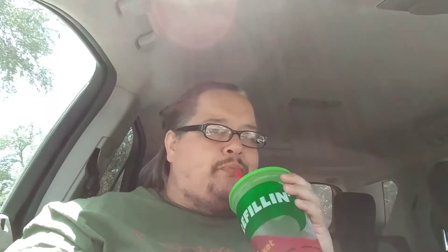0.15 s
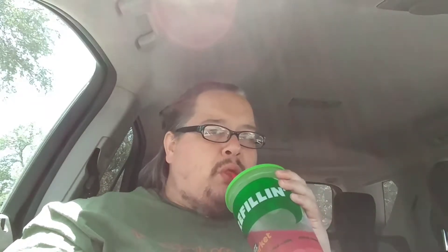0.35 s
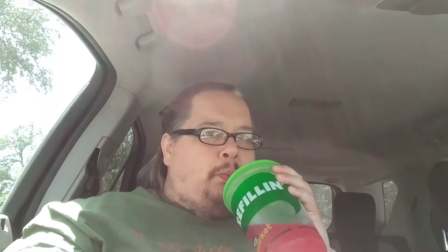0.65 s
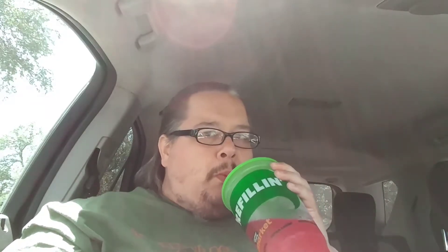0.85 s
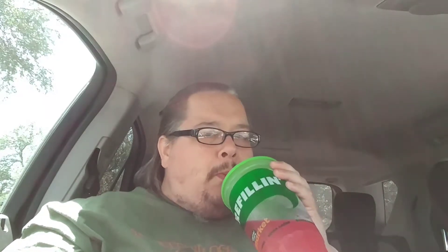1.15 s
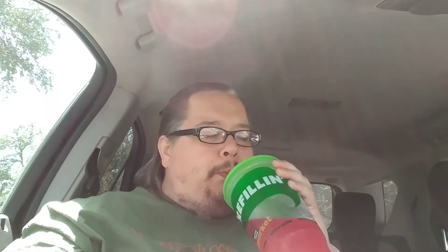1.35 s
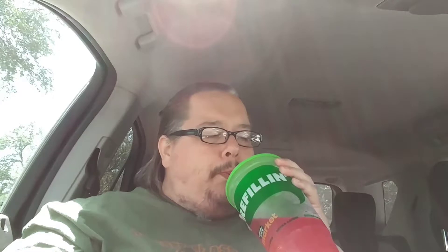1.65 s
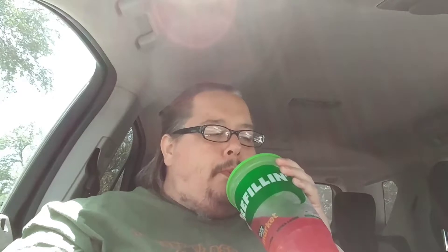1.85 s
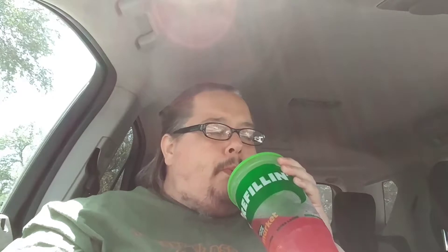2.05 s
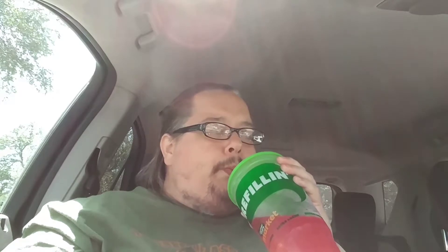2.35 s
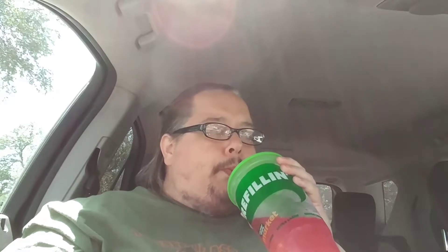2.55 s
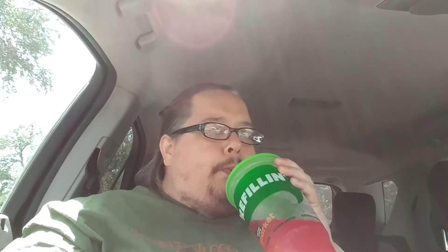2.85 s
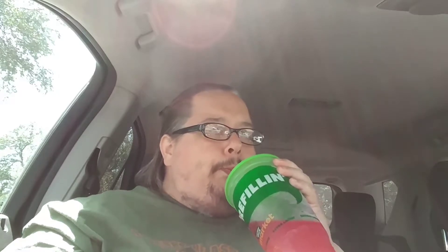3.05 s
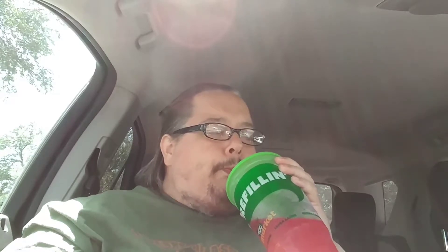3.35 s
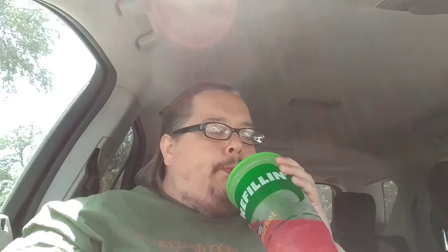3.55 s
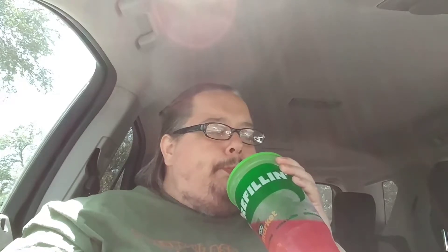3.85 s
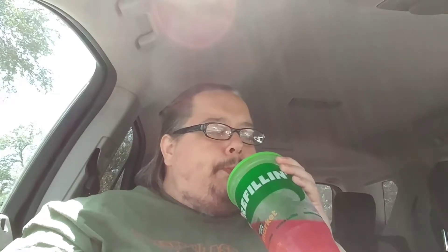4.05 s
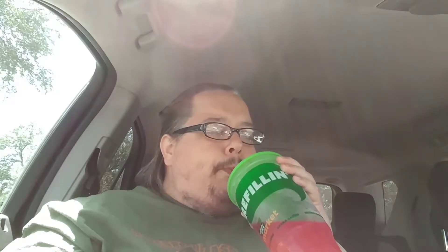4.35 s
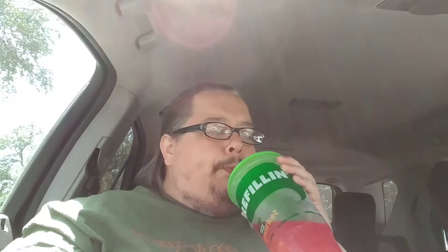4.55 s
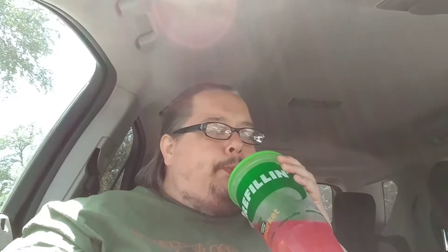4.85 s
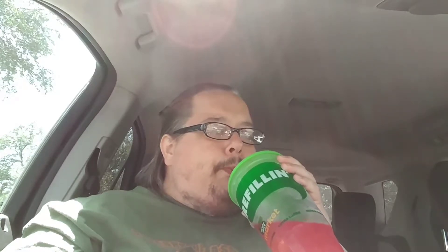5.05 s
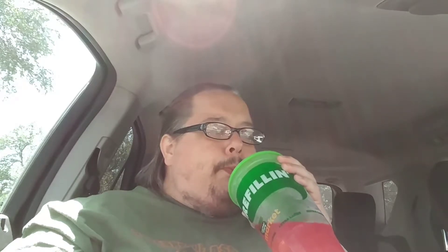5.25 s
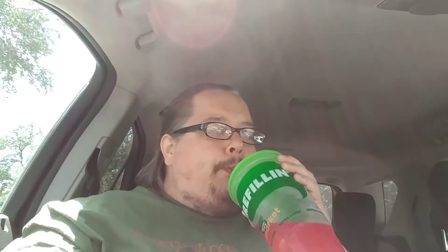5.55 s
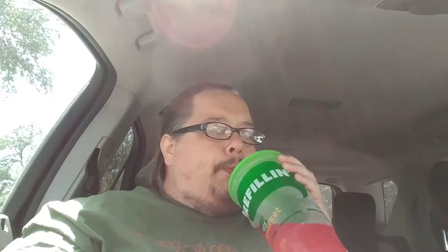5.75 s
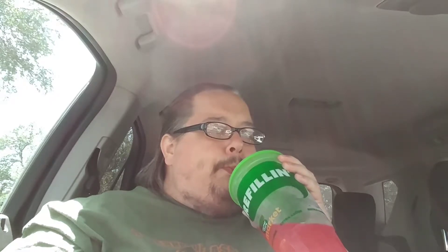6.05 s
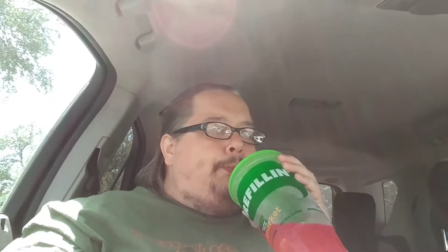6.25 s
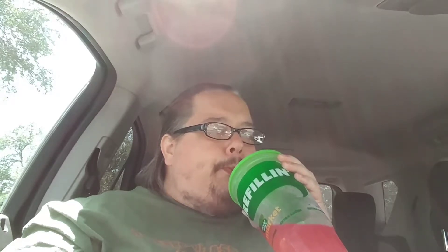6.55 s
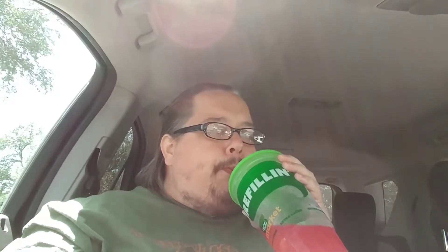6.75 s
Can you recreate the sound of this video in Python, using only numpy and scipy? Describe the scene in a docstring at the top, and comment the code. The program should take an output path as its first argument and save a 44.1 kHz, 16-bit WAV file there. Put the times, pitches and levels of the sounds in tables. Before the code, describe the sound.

Inside a closed parked car, an air-conditioning blower rushes continuously, bass-heavy with an airy top and faint vent whistles. Beneath it the idling engine and fan motor hum low and steady. About a second in, a plastic cup gives one tiny, crisp crackle. The engine hum dips briefly past the middle, and a very faint high hiss flicks by near the end. A small microphone hears it close, identical on both sides.

```python
"""An air-conditioning blower rushes in the closed cabin of a parked car, over the idling engine.
Its air is noise shaped by cabin, duct and vent resonances, with narrow noise bands for whistles.
Fan wheel and engine add hums: sines on multiples of a slightly wavering speed.
A plastic cup crackles once as decaying sines; a faint swell of high noise hisses near the end.
One small microphone in the cabin hears it all, the same on both channels."""
import sys
import numpy as np
from scipy import signal
from scipy.fft import rfft, irfft
from scipy.io import wavfile

SR = 44100
rng = np.random.default_rng(int(sys.argv[2]) if len(sys.argv) > 2 else 0)


def wrap_up_sound(samples):
    """Save the sound to the file named by the first command line argument, as 16-bit audio."""
    columns = np.atleast_2d(samples).T
    # keep every value between -1 and 1, then stretch to whole-number steps
    tamed = np.clip(columns, -1, 1)
    steps = np.round(tamed * 32767).astype(np.int16)
    wavfile.write(sys.argv[1], SR, steps)


N = 304731  # length in samples


def from_db(db):
    """Turn decibels into an amplitude factor."""
    return 10 ** (np.asarray(db) / 20)


def rms_one(x):
    """Scale a signal to an rms of 1."""
    return x / np.sqrt(np.mean(x ** 2) + 1e-20)


def drift(rate_hz):
    """Slow chance: noise through a double one-pole low-pass, scaled to a spread of 1."""
    run_in = 2 * SR
    pole = np.exp(-2 * np.pi * rate_hz / SR)
    noise = rng.standard_normal(N + run_in)
    slow = signal.lfilter([1], [1, -2 * pole, pole * pole], noise)
    return rms_one(slow[run_in:])


def bell(hz, width_hz, db):
    """One resonance or cancellation as a peaking or dipping filter section."""
    root_gain = from_db(db / 2)
    w = 2 * np.pi * hz / SR
    alpha = np.sin(w) * width_hz / (2 * hz)
    middle = -2 * np.cos(w)
    zeros = [1 + alpha * root_gain, middle, 1 - alpha * root_gain]
    poles = [1 + alpha / root_gain, middle, 1 - alpha / root_gain]
    return np.array(zeros + poles) / poles[0]


def hum(turn_hz, orders, waver):
    """Sines on multiples of a rotation whose speed wavers a little, each with a random phase."""
    turns = np.cumsum(turn_hz * (1 + waver * drift(0.49))) / SR
    out = np.zeros(N)
    for multiple, level_db in orders:
        phase = multiple * turns + rng.random()
        out += np.sqrt(2) * from_db(level_db) * np.sin(2 * np.pi * phase)
    return out


def cabin(x):
    """Direct sound plus a short dense tail from glass and trim."""
    t60_s, tail_db = 0.05, -17
    t = np.arange(SR // 5) / SR
    tail = rng.standard_normal(len(t)) * from_db(-60 * t / t60_s)
    # only the upper range: air() holds the lower cabin modes
    upper = signal.butter(2, 2500, "high", fs=SR, output="sos")
    tail = signal.sosfilt(upper, tail)
    tail = tail / np.sqrt(np.sum(tail ** 2))
    return x + from_db(tail_db) * signal.fftconvolve(x, tail)[:N]


def hiss():
    """Faint high-passed noise under a short swell: rise, hold, slower fall."""
    low_hz, level_db = 12500, -50
    at_s, hold_s = 6.402, 0.03  # start and length of the loud part
    rise_s, fall_s = 0.025, 0.065  # time to gain, then to lose, 14 dB
    t = np.arange(N) / SR - at_s
    high_pass = signal.butter(4, low_hz, "high", fs=SR, output="sos")
    bright = rms_one(signal.sosfilt(high_pass, rng.standard_normal(N)))
    outside = np.maximum(-t / rise_s, (t - hold_s) / fall_s)
    under_db = 14 * np.maximum(outside, 0)
    return from_db(level_db - under_db) * bright


def cup():
    """Each crack strikes every mode of the thin plastic with a strength of its own."""
    # the clearest cracks: start_s, level_db
    clear_cracks = [(.9153, -37), (.9206, -35), (.9272, -32), (.9370, -35), (.9408, -30), (.9627, -39),
                    (.9666, -37)]
    # ringing modes of the thin plastic: pitch_hz, level_db (added to the crack's), t60_s
    plastic_modes = [(7000, 6, .005), (8700, 5, .004), (10900, 1, .006), (12700, -1, .004),
                     (14200, -1, .004), (15400, -7, .003)]
    small_count, from_s, to_s, small_db = 14, 0.912, 0.972, -47
    # fainter cracks at random in between, within 4 dB either way
    draws = rng.uniform((from_s, -4), (to_s, 4), (small_count, 2))
    small_cracks = [(start_s, small_db + db) for start_s, db in draws]
    out = np.zeros(N)
    t = np.arange(SR // 50) / SR
    for start_s, crack_db in list(clear_cracks) + small_cracks:
        at = round(start_s * SR)
        for hz, mode_db, t60_s in plastic_modes:
            uneven_db = rng.normal(0, 2.8)
            envelope = from_db(crack_db + mode_db + uneven_db - 60 * t / t60_s)
            out[at:at + len(t)] += envelope * np.sin(2 * np.pi * hz * t)
    return out


def engine():
    """The idle hum on multiples of the firing rate, with one brief dip in level."""
    firing_hz = 29.97
    dip_at_s, dip_length_s, dip_depth_db = 4.45, 0.17, -8
    # idling engine: multiple of the firing rate, level_db (rms, outside the dip)
    firing_orders = [(1, -29), (2, -21)]
    t = np.arange(N) / SR
    dip_db = dip_depth_db * np.exp(-((t - dip_at_s) / dip_length_s) ** 2)
    return from_db(dip_db) * hum(firing_hz, firing_orders, waver=0.0025)


def fan():
    """Fan wheel and motor hum on multiples of a nearly steady shaft speed."""
    shaft_hz = 45.78
    # fan wheel and motor: multiple of the shaft speed, level_db (rms)
    shaft_orders = [(1, -26.5), (4, -34.5), (5, -35), (6, -35.5), (9, -43), (12, -41.5), (13, -66),
                    (16, -47)]
    return hum(shaft_hz, shaft_orders, waver=0.00059)


def whistles():
    """Vent whistles: noise in narrow bands, each swelling and fading slowly."""
    # vent whistles: pitch_hz, width_hz, level_db (rms, before the swing)
    vent_tones = [(1676, 30, -42.5), (2116, 13, -49)]
    swing_db = 1.5
    out = np.zeros(N)
    for hz, width_hz, level_db in vent_tones:
        edges_hz = [hz - width_hz / 2, hz + width_hz / 2]
        band = signal.butter(2, edges_hz, "band", fs=SR, output="sos")
        tone = rms_one(signal.sosfilt(band, rng.standard_normal(N)))
        out += from_db(level_db + swing_db * drift(0.56)) * tone
    return out


def air():
    """Blower rush: tilted turbulence flutters with the flow, then booms and sings in resonances."""
    # turbulence of the air stream: pitch_hz, level_db (per Hz, relative)
    turbulence = [(30, -21), (50, -7), (95, -6), (130, -11), (290, -14.5), (330, -19.5), (600, -24.5),
                  (950, -31.5), (2100, -33), (2300, -35.5), (4900, -41), (7600, -40.5), (10000, -52.5),
                  (12000, -60.5), (14000, -62), (16000, -68)]
    # standing waves of the cabin and cancellations between them: pitch_hz, width_hz, gain_db
    cabin_modes = [(67.7, 2.9, -2.5), (82, 21.3, 6), (98.3, 11.6, -7.5), (113.7, 10, 3.5), (129.8, 9.5, -7),
                   (145.6, 17, 1.5), (174, 13, -4), (234.8, 12.5, -6.5), (191, 35, 3), (278.3, 15, 4.5)]
    # duct and vent resonances and cancellations between them: pitch_hz, width_hz, gain_db
    duct_modes = [(464, 47, 5), (546, 19, 5), (598, 15, -2.5), (707, 28, -5), (747, 110, 3), (1163, 140, 5),
                  (972, 40, -2), (1275, 27, -4.5), (1289, 97, 5), (1580, 40, -4), (1659, 63, 7.5),
                  (1760, 76, -4), (1845, 50, 2), (1905, 30, -1), (1960, 90, 5), (2026, 48, -2.5),
                  (2095, 62, 4.5), (2195, 60, -4), (2450, 36, -3.5), (2750, 70, 4.5), (2810, 60, -2.5),
                  (3560, 85, 3.5), (5320, 330, 4), (5900, 280, 2.5), (6560, 200, 3), (6840, 200, 3),
                  (7500, 100, -2.5), (7100, 220, -2.5), (8500, 410, 1.5), (11050, 300, 3)]
    level_db = -14.5
    flutter_db, flutter_hz = 0.47, 9.6  # unsteady flow
    vent_hz, vent_flutter_db = 4020, 0.09  # above this the vent jets flutter on their own

    hz = np.maximum(np.arange(N // 2 + 1) * SR / N, 1)
    knots_hz, knots_db = np.transpose(turbulence)
    tilt_db = np.interp(np.log(hz), np.log(knots_hz), knots_db)
    tilted = rfft(rng.standard_normal(N)) * from_db(tilt_db)
    jets = irfft(tilted * hz ** 4 / (hz ** 4 + vent_hz ** 4), N)
    jet_change = from_db(vent_flutter_db * drift(20)) - 1
    rush = irfft(tilted, N) + jets * jet_change
    rush = rush * from_db(flutter_db * drift(flutter_hz))
    resonances = [bell(*mode) for mode in list(duct_modes) + list(cabin_modes)]
    return from_db(level_db) * rms_one(signal.sosfilt(resonances, rush))


def scene():
    """Air, cup and hiss with the cabin's tail; whistles and hums direct; alike on two channels."""
    in_cabin = cabin(air() + cup() + hiss())
    mono = in_cabin + whistles() + fan() + engine()
    return np.tile(mono, (2, 1))


def record(dry):
    """Small microphone: port resonance, bass cut, gently rounded peaks, steep top cut."""
    port_hz, port_width_hz, port_db = 6664, 1380, 8
    bass_cut_hz, top_cut_hz = 39, 15740
    x = signal.sosfilt([bell(port_hz, port_width_hz, port_db)], dry)
    bass_cut = signal.butter(8, bass_cut_hz, "high", fs=SR, output="sos")
    x = signal.sosfilt(bass_cut, x)
    x = 2.2 * np.tanh(x / 2.2)
    top_cut = signal.ellip(11, 0.3, 55, top_cut_hz, fs=SR, output="sos")
    return signal.sosfilt(top_cut, x)


dry = scene()
out = record(dry)
wrap_up_sound(out)
```